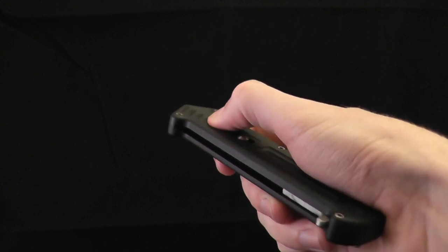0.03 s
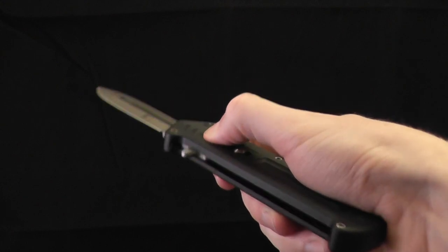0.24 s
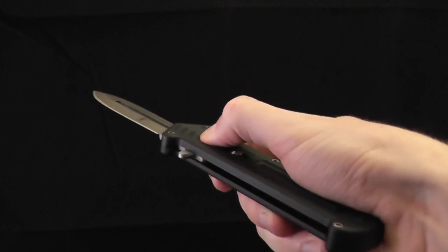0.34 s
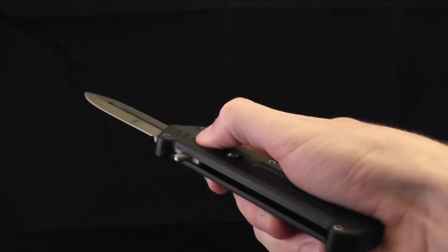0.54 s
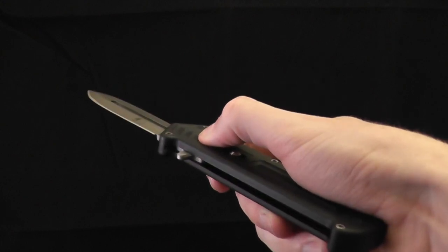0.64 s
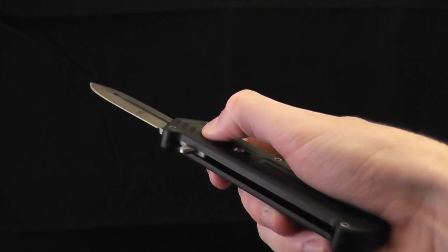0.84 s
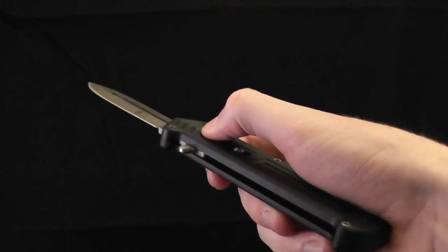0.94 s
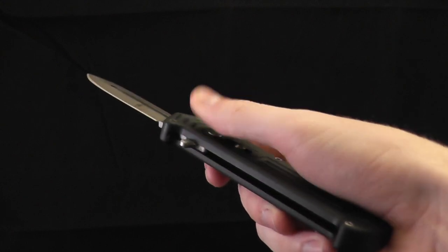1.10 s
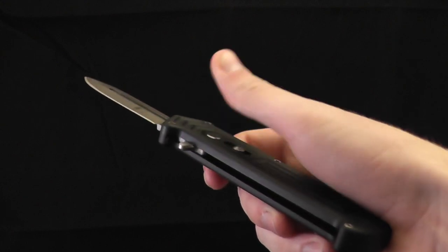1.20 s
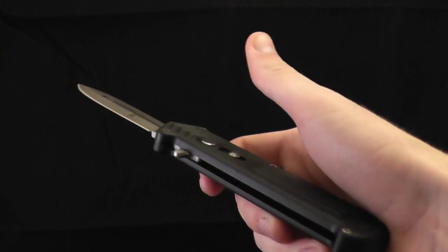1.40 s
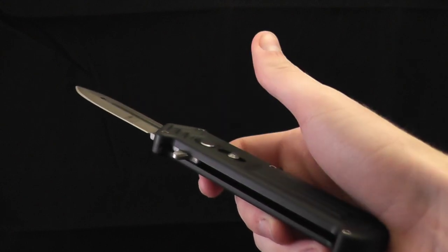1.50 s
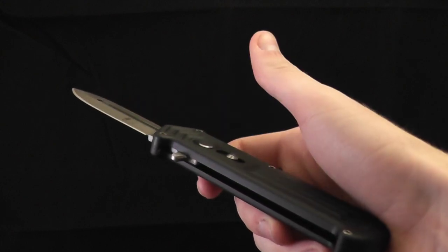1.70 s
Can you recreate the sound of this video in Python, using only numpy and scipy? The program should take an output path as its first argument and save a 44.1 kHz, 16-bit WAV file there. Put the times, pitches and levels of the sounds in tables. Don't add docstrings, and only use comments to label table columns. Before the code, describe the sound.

A spring-fired knife blade snaps open with one hard metallic clack and a short room ring

```python
import sys
import numpy as np
from scipy import signal
from scipy.fft import rfft, irfft, next_fast_len
from scipy.io import wavfile

SR = 44100
rng = np.random.default_rng(int(sys.argv[2]) if len(sys.argv) > 2 else 0)


def dump(signal):
    limited = np.clip(np.atleast_2d(signal).T, -1, 1)
    pcm = np.round(limited * 32767).astype(np.int16)
    wavfile.write(sys.argv[1], SR, pcm)


def ratio(d):
    e = np.asarray(d, float) / 20
    return 10 ** e


N = 77175
T = np.arange(N) / SR
BLOW_T = T[:SR // 8]
SCATTER_DB = 2.5


def unit(x):
    return x / np.sqrt(np.mean(x ** 2) + 1e-20)


def along(points, hz):
    f, v = np.transpose(points)
    return np.interp(np.log(hz + 1), np.log(f + 1), v)


def filtered(x, response):
    m = next_fast_len(N + 8192)
    return irfft(rfft(x, m) * response(np.fft.rfftfreq(m, 1 / SR)), m)[..., :N]


def noise(spectrum):
    return unit(filtered(rng.standard_normal(N), lambda hz: ratio(along(spectrum, hz))))


def tone(hz, db):
    return ratio(db) * np.sqrt(2) * np.sin(2 * np.pi * hz * T)


def ring(modes, spread_db):
    contact_s = 0.0001924
    t = BLOW_T
    out = np.zeros(len(t))
    chance = rng.standard_normal((len(modes), 3))
    for (hz, db, t60), (louder, detune, phase) in zip(modes, chance):
        decay = ratio(db + spread_db * louder - 60 * t / t60)
        out += decay * np.sin(2 * np.pi * (hz * (1 + 0.014 * detune) * t + phase))
    return out * (1 - np.exp(-t / contact_s)) / 3


def add(out, s, x):
    part = out[..., round(s * SR):][..., :x.shape[-1]]
    part += x[..., :part.shape[-1]]


# frequency in Hz, level in dB per Hz.
AIR_FRONT = [(15, -50), (25, -42), (76, -7), (105, -12.5), (236, -9.5), (760, -20), (1020, -24.5),
             (3080, -31.5), (6200, -30.5), (16000, -41.5)]
# frequency in Hz, level in dB per Hz.
AIR_SIDE = [(15, -51), (25, -21), (123, -3), (416, -6.5), (1020, -15.5), (1230, -20.5), (4740, -44),
            (5730, -37.5), (16000, -42.5)]
# centre in Hz, width in Hz, level in dB.
DRONES = [(74, 26, -74), (131, 19, -74), (234, 36, -67.5), (504.2, 18, -80), (600, 15, -84.5),
          (1200, 15, -85.5), (2550, 250, -87)]
# time in seconds, pitch in Hz, level in dB.
FAN = [(0, 79, -68), (.1, 78, -68), (.2, 76, -80), (.44, 78, -81), (.65, 78, -66), (.72, 77, -77),
       (.786, 74.5, -63), (.83, 74.7, -77), (.95, 74.8, -67), (.99, 74.8, -78), (1.03, 74.7, -63),
       (1.6, 74.83, -66.5), (1.75, 72, -64)]


def ventilation():
    front = ratio(-64) * noise(AIR_FRONT) + tone(722, -73.5)
    for centre, width, db in DRONES:
        resonance = lambda f: 1 / (1 + (2 * (f - centre) / width) ** 2)
        front += ratio(db) * unit(filtered(rng.standard_normal(N), resonance))
    when, fan_hz, fan_db = np.transpose(FAN)
    turns = np.cumsum(np.interp(T, when, fan_hz)) / SR
    front += ratio(np.interp(T, when, fan_db)) * np.sqrt(2) * np.sin(2 * np.pi * turns)
    return np.array([front, ratio(-62) * noise(AIR_SIDE)])


# frequency in Hz, level in dB, 60 dB decay in seconds.
MOTOR = [(2600, -2.5, .014), (2950, -4.5, 0.012), (3160, -3.5, 0.02)]
# start in seconds, peak in dB, pitch in Hz.
LOUD_TICKS = [(0.867, -66, 3120), (0.9004, -72, 3150), (1.0176, -68, 3080), (1.0334, -69, 3060),
              (1.0665, -68, 2760), (1.1009, -65, 3050), (1.1338, -63.5, 3070), (1.1504, -65, 3030),
              (1.1677, -64, 3140), (1.2342, -68, 3040), (1.3344, -64, 3100), (1.3504, -66, 2624),
              (1.4672, -70, 3120), (1.4825, -70, 2576), (1.5174, -66, 2710), (1.5663, -67, 3130),
              (1.6013, -66, 2990), (1.6347, -67, 3160), (1.6511, -64.5, 3120), (1.6682, -62, 2970),
              (1.7345, -67, 3060)]


def camera_ticks():
    ticks_per_s, first_s = 60, .0006
    tick_db, spread_db, alternate_db = -71, 2.5, 2.5
    swell_db, swell_s, swell_top_s = 1.5, .5, .15
    k = np.arange(int(N / SR * ticks_per_s))
    s = first_s + k / ticks_per_s
    swell = swell_db * np.cos(2 * np.pi * (s - swell_top_s) / swell_s)
    db = tick_db + alternate_db * (-1.) ** k + swell + spread_db * rng.standard_normal(len(k))
    steps = np.bincount((s * SR).astype(int), ratio(db), N)
    out = 3 * signal.fftconvolve(steps, ring(MOTOR, 0))[:N]
    for when, peak_db, hz in LOUD_TICKS:
        add(out, when, 3 * ring([(hz, peak_db + .3, .02)], 0))
    return out


# start in seconds, length in seconds, level in dB.
RUSTLE = [
    (0.015, 0.0056, -66),
    (0.082, 0.0084, -71.5),
    (0.11, .01, -74),
    (0.739, 0.062, -69),
    (0.813, 0.013, -68),
    (.845, .015, -75),
]
# frequency in Hz, level in dB.
SKIN = [(2500, -30), (4000, 4), (6000, 8), (9000, 3), (13000, -23)]


def thumb():
    swells = np.zeros(N)
    for s, length, db in RUSTLE:
        swells += ratio(db) * np.sin(np.pi * np.clip((T - s) / length, 0, 1) ** 0.97)
    return noise(SKIN) * swells


# start in seconds, level in dB.
CATCH = [
    (.2156, -27),
    (.2207, -33.5),
    (0.2217, 3.5),
    (.2222, 2.5),
    (0.2228, 1.5),
    (.2236, .3),
    (0.2243, -2.5),
    (.2251, -11),
]
# start in seconds, level in dB.
LOCK = [(.2471, -2.5), (.2479, -2.5), (.2488, -8), (.2497, -5), (.2506, -1.5), (0.2513, -2.5),
        (0.2522, -1.5), (0.2539, -4), (0.2561, -7.5), (.2574, -1.5), (0.2582, -10), (0.2595, -12),
        (.2615, -12), (.2640, -10), (.2665, -13), (.2700, -17)]
# start in seconds, level in dB.
REBOUND = [
    (.2822, -11),
    (.2845, -21),
    (.2872, -21),
]
# frequency in Hz, level in dB, 60 dB decay in seconds.
SPRING = [(1400, -21, 0.0087), (2630, -22.5, .008), (3600, -27.5, .008), (5070, -11, 0.017),
          (5430, -10, .012), (6204, -1, .011), (6500, -4, 0.0091), (7399, 1.5, 0.008), (8370, -7.5, .009),
          (9050, -1, .009), (9700, -12, .008), (11490, -11, .01), (12730, -18, 0.0079),
          (14000, -23.5, .008)]
# frequency in Hz, level in dB, 60 dB decay in seconds.
BLADE = [(1700, -22.5, .008), (4797, -16, 0.01), (5280, -4.5, 0.01), (5733, -7, 0.0105), (6150, -8, 0.014),
         (6700, -8, .009), (7596, -3, .012), (8390, -3, .012), (2930, -16, 0.011), (9621, -3, 0.0041),
         (10440, -11.5, .01), (12860, -14, 0.015), (14000, -11.5, 0.0092), (15700, -15, 0.0069)]
# frequency in Hz, level in dB.
CRACK_COLOUR = [(300, -34.5), (1300, -20), (2500, -9), (5000, -3.5), (8000, -1), (12000, -3), (16000, -6)]
# frequency in Hz, level in dB.
CATCH_TOP = [(8000, .1), (11000, -1.5), (13000, -4.5), (16000, -8)]


def bright(hz):
    return ratio(along(CRACK_COLOUR, hz))


def dull(hz):
    return bright(hz) * ratio(along(CATCH_TOP, hz))


def contacts():
    crack_db, crack_t60_s = -12, 0.0095
    out = np.zeros(N)
    for hits, modes, colour in ((CATCH, SPRING, dull), (REBOUND, SPRING, dull), (LOCK, BLADE, bright)):
        cracks = np.zeros(N)
        for s, db in hits:
            decay = ratio(db + crack_db - 60 * BLOW_T / crack_t60_s)
            add(cracks, s, rng.standard_normal(len(BLOW_T)) * decay)
            add(out, s, ratio(db) * ring(modes, SCATTER_DB))
        out += filtered(cracks, colour)
    return out


# start in seconds, frequency in Hz, level in dB, direction in radians from the front,
# 60 dB decay in seconds.
JOLTS = [(.2219, 900, -15.5, 3.5, 0.0073), (0.27, 600, -29, -1.8, .01), (.2238, 280, -16, -0.1, .009),
         (0.25, 120, -34.5, 0.9, .03), (.2474, 470, -23, 0.44, .025), (.2483, 810, -11, -1.37, .008),
         (0.29, 620, -5.5, 1.6, .012), (.2504, 1300, -10, -1.43, 0.0089),
         (0.2483, 1600, -17.5, -1.5, 0.0073), (.2528, 274.4, -8, -1.25, .011),
         (.2546, 74, -16, 4.05, 0.026), (.2586, 130, -20, 2.2, .025), (.2494, 750, -22, 0.34, .01),
         (.2157, 1300, -39, 0.4, 0.0098), (.2480, 1850, -22.5, 0.4, .012)]


def handle():
    out, t = np.zeros((2, N)), BLOW_T
    for s, hz, db, way, t60 in JOLTS:
        direction = np.array([[np.cos(way)], [np.sin(way)]])
        add(out, s, direction * ratio(db - 60 * t / t60) * np.sin(2 * np.pi * hz * t))
    return out


# frequency in Hz, 60 dB decay in seconds.
ROOM_T60 = [(300, .4), (1500, 0.69), (4000, .62), (5250, 0.58), (6300, .47), (8000, 0.42), (12000, 0.34),
            (15000, 0.22)]
# frequency in Hz, level in dB.
ROOM_COLOUR = [(250, -18), (700, -11), (1350, .3), (2900, 2.5), (4000, 1.15), (5500, 4.5), (6300, -3),
               (7800, 1.5), (15000, -7)]
# frequency in Hz, level in dB relative to the front.
ROOM_SIDE = [(200, 12.5), (1200, -2.5), (2500, -7), (4000, -13.5), (8000, -9.5), (14000, -4.5)]


def room(x):
    room_db, delay_s = -11.5, 0.0079
    hz, t, z = signal.stft(rng.standard_normal((2, SR)), SR, nperseg=256)
    decay = ratio(-60 * t / along(ROOM_T60, hz)[:, None])
    tail = signal.istft(z * decay, SR, nperseg=256)[1]
    tail = tail / np.linalg.norm(tail[0])
    late = np.pad(x, (round(delay_s * SR), 0))
    wet = signal.fftconvolve(late[None], tail, axes=1)[:, :N]
    colour = lambda f: ratio(along(ROOM_COLOUR, f) + [0 * f, along(ROOM_SIDE, f)])
    return ratio(room_db) * filtered(wet, colour)


# frequency in Hz, level in dB, 60 dB decay in seconds.
TRACK = [(2850, -21, .006), (5220, -6, .009), (6100, -2.5, .008), (6680, -5, .007), (7500, -1, .008),
         (8400, -2.5, .008), (9700, -5, 0.007), (11300, -9, 0.006), (12800, -12, 0.006)]


def scrape():
    start_s, end_s, slide_db, grows_db = .224, .248, -25, -5
    grit_per_s, grit_db = 14000, 1.5
    chance, sign, size = rng.random((3, N))
    grit = (chance < grit_per_s / SR) * np.sign(sign - .5) * ratio(-grit_db * np.log(size + 1e-9))
    way = (T - start_s) / (end_s - start_s)
    sliding = (way > 0) & (way < 1)
    grit = grit * sliding * ratio(grows_db * np.clip(way, 0, 1))
    out = signal.fftconvolve(grit, ring(TRACK, 0))[:N] + 1.8 * filtered(grit, dull)
    return ratio(slide_db) * out / np.std(out[sliding])


# frequency in Hz, level in dB, 60 dB decay in seconds.
RING = [(3855, -21, .04), (3920, -14, 0.075), (3980, -20.5, .04), (4040, -12.5, .06), (5110, -22, .035),
        (5210, -14, .04), (5310, -14, 0.04), (5420, -21, .03), (7040, -22, .03), (7640, -20, 0.037)]


def blade():
    start_s, rise_s = .2492, .0015
    t = np.clip(T - start_s, 0, None)
    song = sum(ratio(db - 60 * t / t60) * np.sin(2 * np.pi * hz * t) for hz, db, t60 in RING)
    return song * (1 - np.exp(-t / rise_s))


# start in seconds, level in dB.
SETTLE = [
    (0.5931, -58),
    (0.615, -64),
    (0.6313, -58.5),
    (0.6497, -59.5),
    (0.7605, -60.5),
    (0.8086, -63.5),
]
# frequency in Hz, level in dB, 60 dB decay in seconds.
COIL = [(2700, -3.5, 0.014), (3056, 1, 0.017), (4210, -4, .01), (5860, -4, 0.0096), (7520, -9, 0.0081),
        (9000, -4, 0.0086)]


def settling():
    out = np.zeros(N)
    for s, db in SETTLE:
        add(out, s, 3 * ratio(db) * ring(COIL, SCATTER_DB))
    return out


# frequency in Hz, level in dB relative to the front.
DIRECT_SIDE = [(1500, -24), (4000, -18.5), (6000, -15.5), (9000, -10.5), (14000, -9.5)]


def scene():
    metal, song, jolts = contacts() + scrape(), blade(), handle()
    aside = filtered(metal + song, lambda f: 1j * ratio(along(DIRECT_SIDE, f)))
    wet = room(metal + ratio(-1.5) * song + jolts[0])
    near = np.array([metal + song + thumb() + settling() + camera_ticks(), aside])
    front, side = near + jolts + wet + ventilation()
    return np.array([front + side, front - side])


def roll_off(x):
    return signal.sosfilt(signal.butter(12, 16720, fs=SR, output="sos"), x)


# centre in Hz, width in Hz, depth from 0 to 1.
HOUSING = [(986, 140, 0.9), (2170, 400, 0.75), (4473, 430, .8)]
# time in seconds, gain in dB.
GAIN = [
    (.2212, 1),
    (.2222, -5),
    (.247, 2),
    (.2525, -2.5),
    (.258, -6.5),
    (.270, -16),
    (.295, -12),
    (.34, -1.5),
    (.5, 0.5),
]


def record(dry):
    def housing(f):
        response = 1
        for c, w, depth in HOUSING:
            band = 1j * f * w / (c * c - f * f + 1j * f * w)
            response = response * (1 - np.clip(depth, 0, 1) * band)
        return response

    x = filtered(dry, housing) * ratio(np.interp(T, *np.transpose(GAIN)))
    top, hardness = .78, 4
    x = x / (1 + np.abs(x / top) ** hardness) ** (1 / hardness)
    top_hz, slope_hz = 15800, 60
    x = filtered(x, lambda f: .5 * (1 - np.tanh((f - top_hz) / slope_hz)))
    return roll_off(x)


dry = scene()
out = record(dry)
dump(out)
```